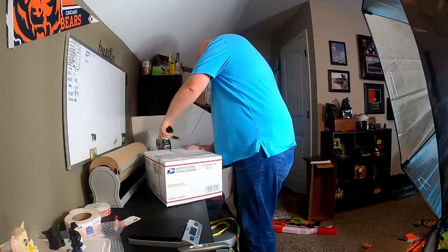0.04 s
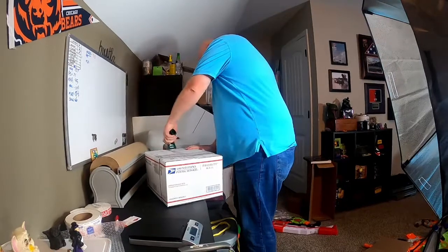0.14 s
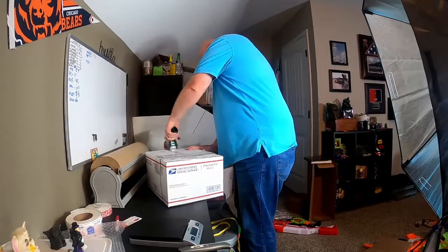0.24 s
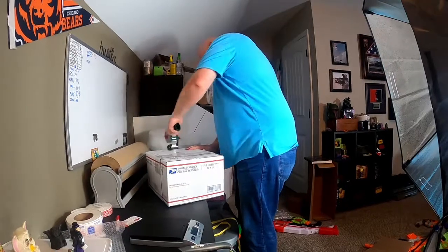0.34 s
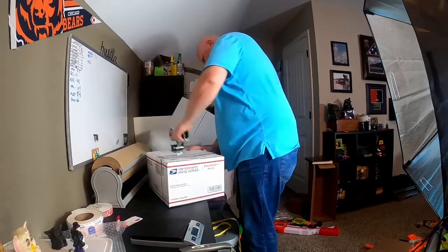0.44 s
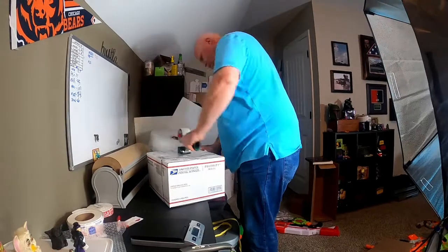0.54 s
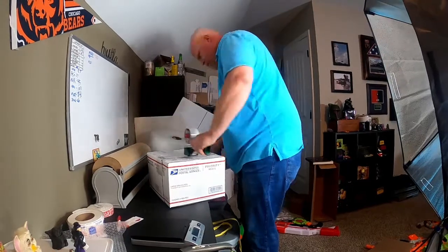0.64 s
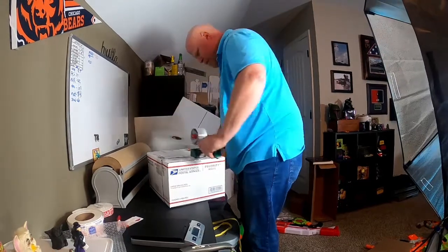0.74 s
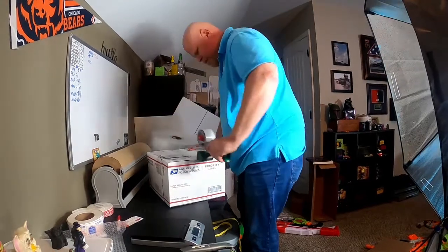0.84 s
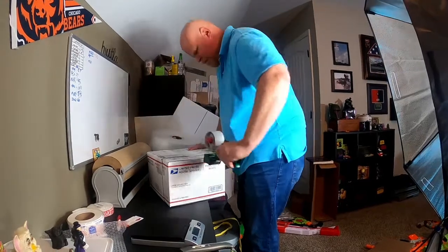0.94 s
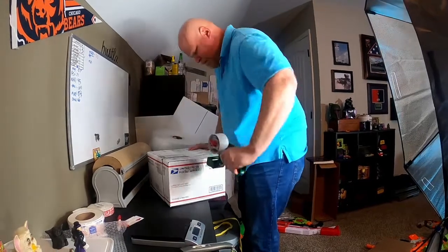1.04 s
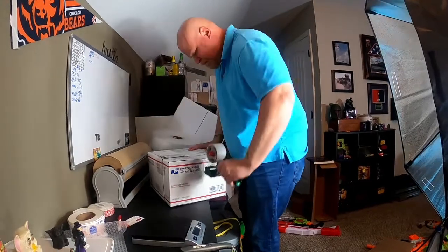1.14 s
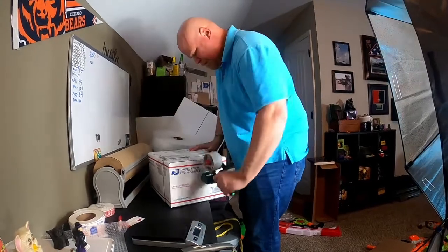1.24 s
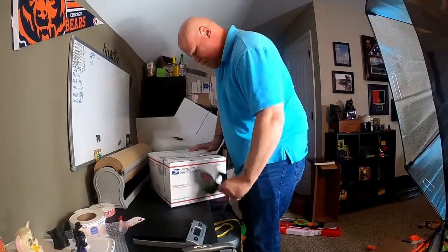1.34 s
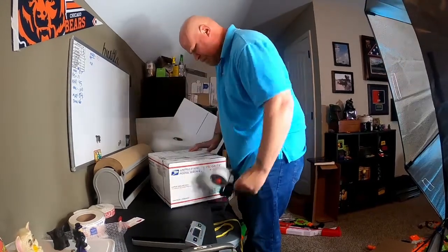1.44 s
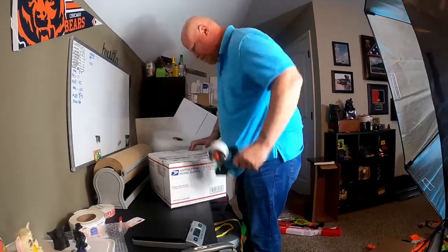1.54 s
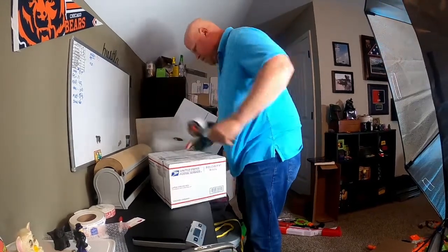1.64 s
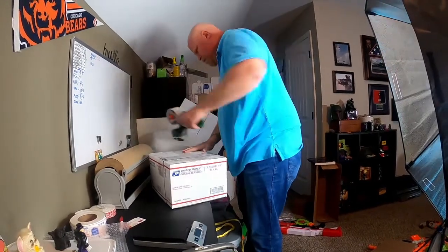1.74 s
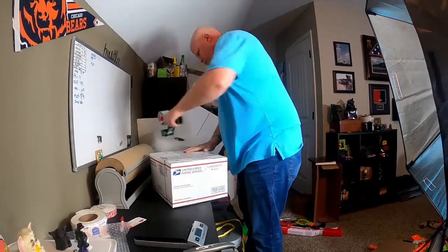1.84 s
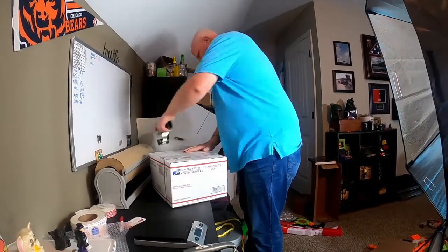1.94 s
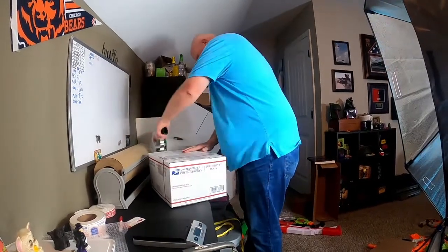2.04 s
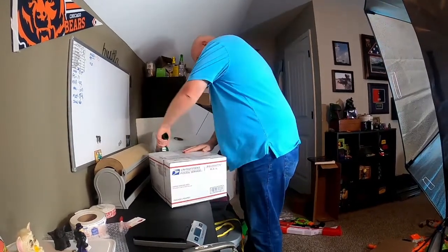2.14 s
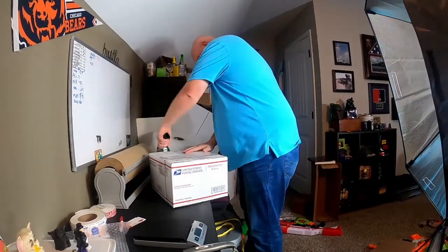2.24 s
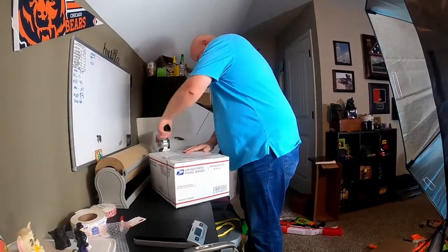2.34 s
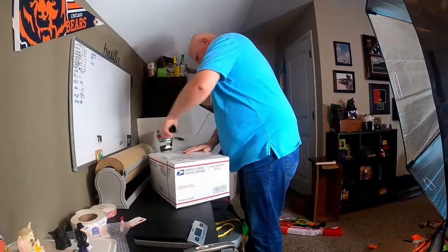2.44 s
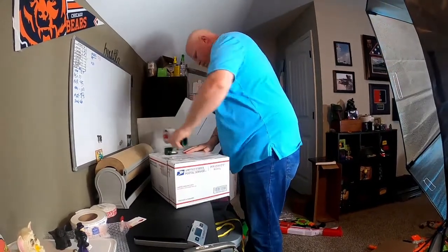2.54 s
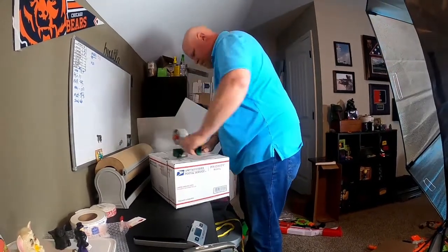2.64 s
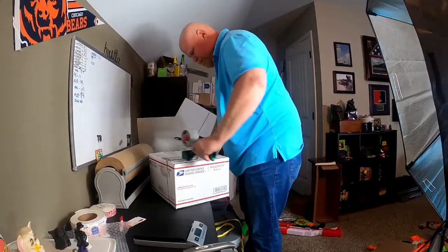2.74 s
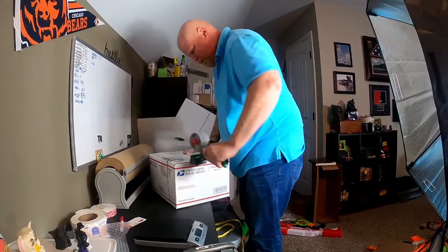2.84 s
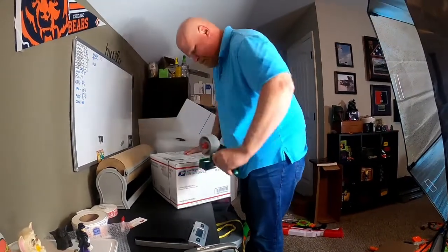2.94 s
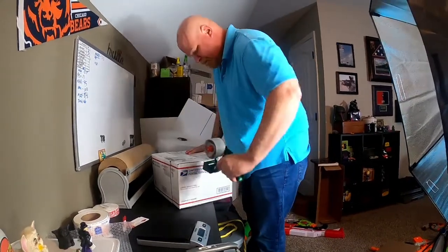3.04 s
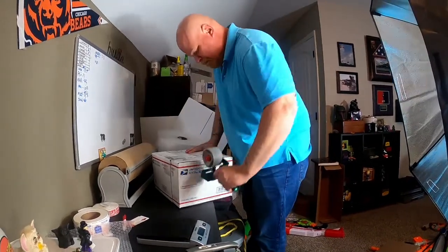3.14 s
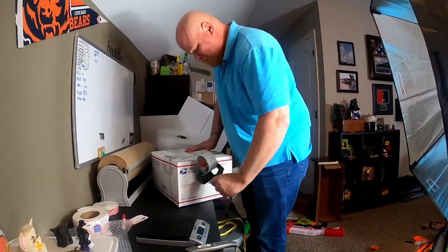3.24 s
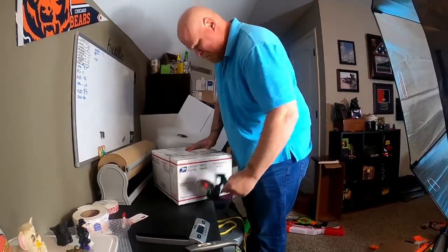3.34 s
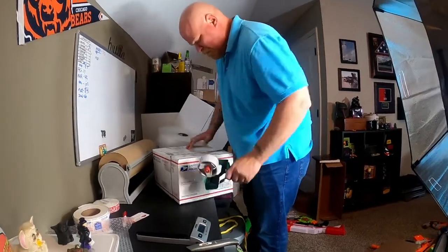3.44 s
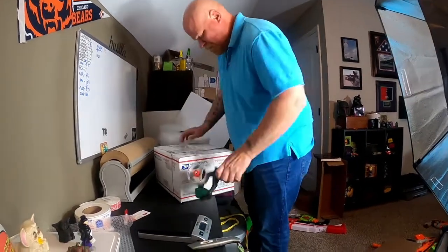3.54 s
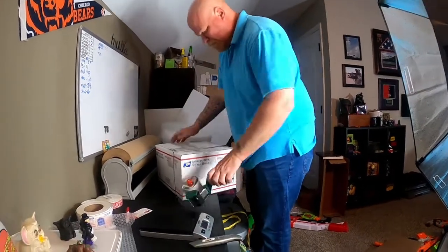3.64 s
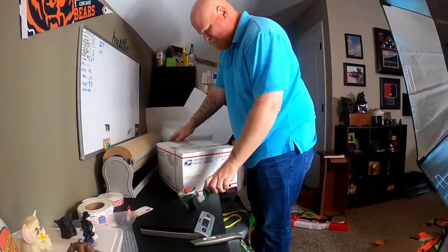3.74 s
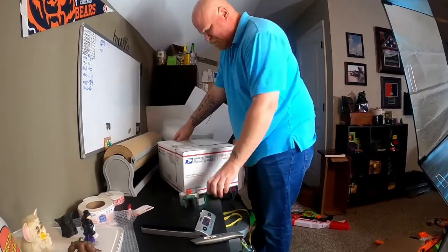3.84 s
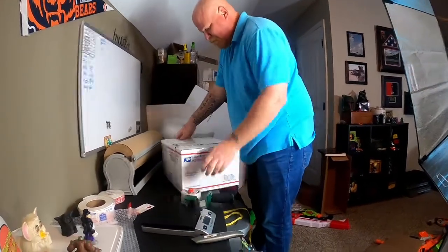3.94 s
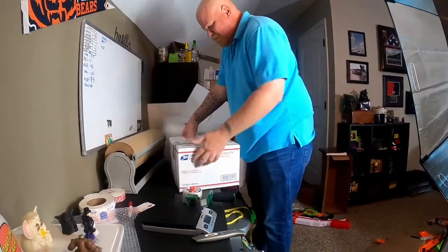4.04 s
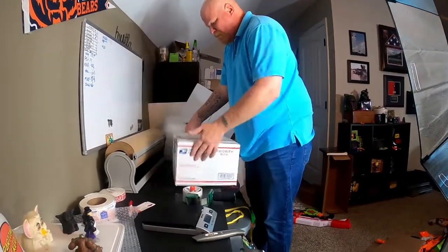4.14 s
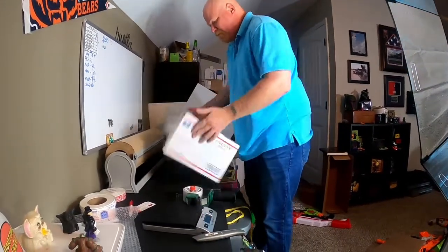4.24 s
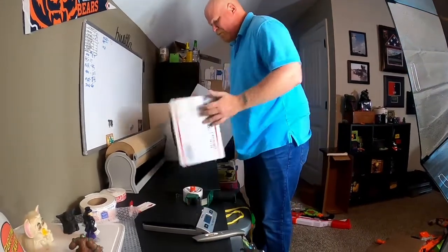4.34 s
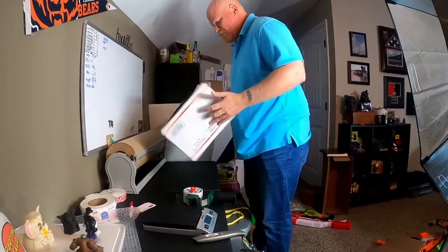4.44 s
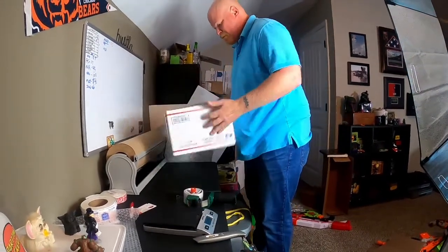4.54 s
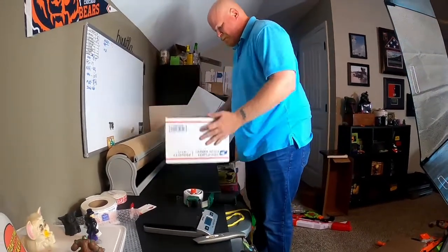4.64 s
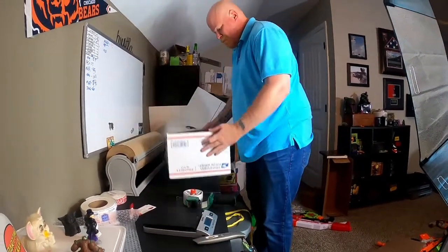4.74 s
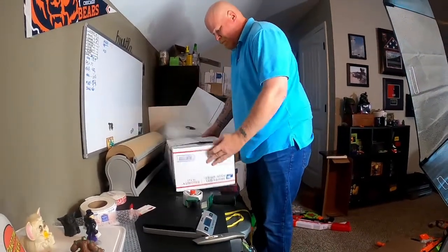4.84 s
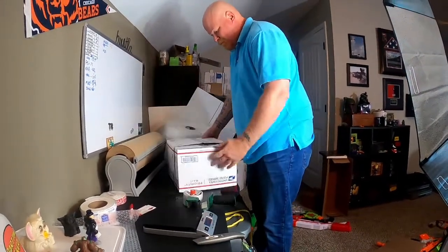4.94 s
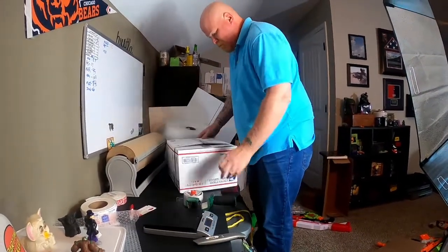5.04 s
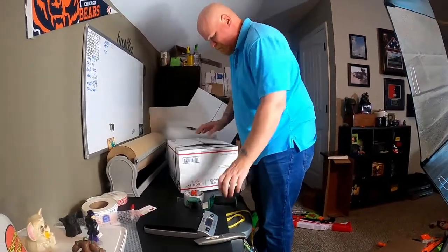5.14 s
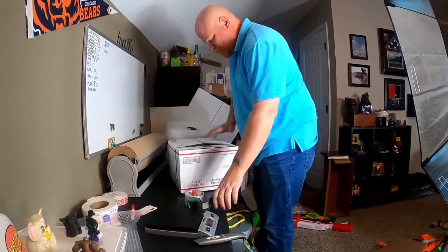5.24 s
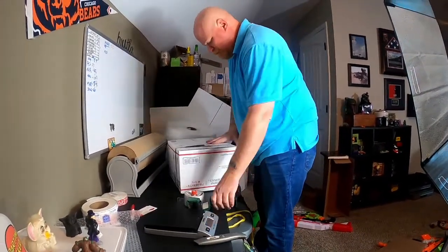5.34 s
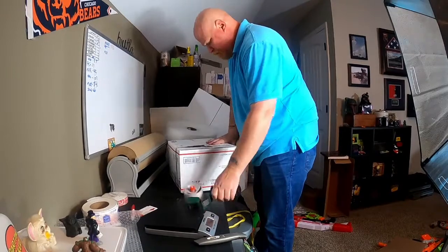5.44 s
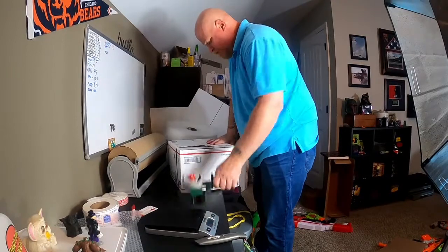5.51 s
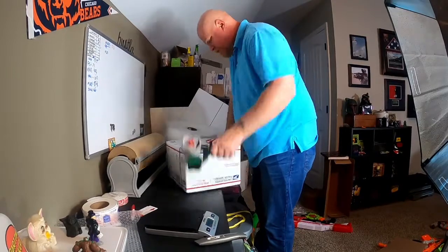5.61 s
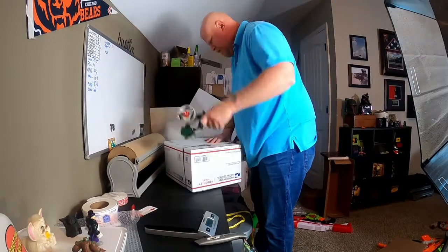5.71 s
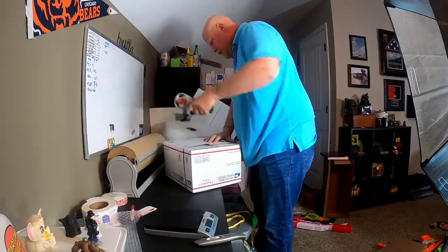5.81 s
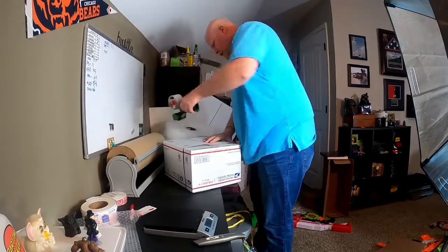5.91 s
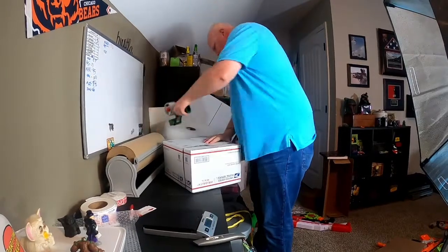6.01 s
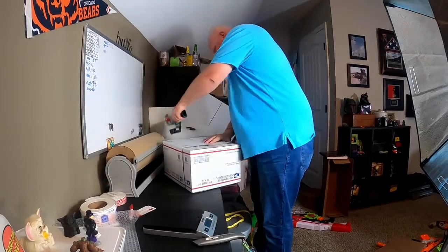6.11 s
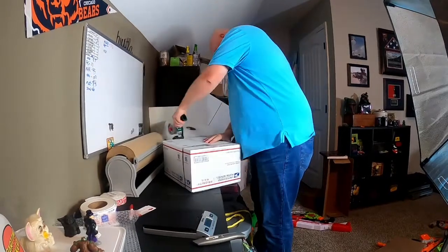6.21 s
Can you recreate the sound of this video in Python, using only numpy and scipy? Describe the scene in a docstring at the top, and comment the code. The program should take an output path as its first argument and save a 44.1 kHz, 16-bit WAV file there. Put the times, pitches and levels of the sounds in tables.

```python
"""Tape screeches off the roll of a hand tape gun: glue lets go in a dense run of stick-slip snaps.
Twice the gun lands on the lid of a cardboard box, draws the tape along it, and the blade tears it off.
The gun is put down, the box is turned over and dropped on the table, and the gun rattles as it is picked up.
Blows excite damped modes and bursts of noise; hands rub, flex and crinkle the card with shaped noise.
Random reflections of a small furnished room surround it all, over a low rumble and a faint hiss."""
import sys
import numpy as np
from scipy import signal
from scipy.fft import rfft, irfft, next_fast_len
from scipy.io import wavfile
from scipy.ndimage import uniform_filter1d, map_coordinates

SR = 44100
rng = np.random.default_rng(int(sys.argv[2]) if len(sys.argv) > 2 else 0)


def master_out(mix):
    """Clip the mix to full scale and print it as 16-bit PCM to the path in sys.argv[1]."""
    frames = np.transpose(np.atleast_2d(mix))
    ceiling = np.clip(frames, -1, 1)
    pcm = np.round(ceiling * 32767).astype(np.int16)
    wavfile.write(sys.argv[1], SR, pcm)


N = 276507
TIME = np.arange(N) / SR

# All levels in the tables are relative: the sources and the room scale them further.

# Room tone, a low rumble. Each row: frequency in Hz, spectral density in dB per Hz.
RUMBLE_SPECTRUM = [(12, -19.5), (20, -29.5), (43, -0.5), (64, 8), (78, -6), (89, -11.5), (124, -6),
                   (178, -24.5), (674, -64.5), (1350, -57.5), (3270, -67), (5380, -51), (10500, -69.5),
                   (13100, -81.5), (15000, -76)]
# Faint ventilation. Each row: frequency in Hz, spectral density in dB per Hz.
HISS_SPECTRUM = [(180, -39.5), (300, -7), (341, -8), (427, -10), (726, -16.5), (1430, -14.5), (1680, -19.5),
                 (14000, -51.5)]
RUMBLE_DB, HISS_DB = -42.5, -65   # rms ahead of the room

# Likeness of the reflections at the two sides. Each row: frequency in Hz, correlation from -1 to 1.
SIDE_CORRELATION = [(100, .99), (350, .92), (1000, .76), (2000, .62), (4000, .45), (8000, .15),
                    (14000, -.1)]
# Balance of the two sides. Each row: frequency in Hz, left minus right in dB.
SIDE_BALANCE = [(100, 1.56), (600, 1.7), (1300, 2.1), (2500, 4), (4000, 4), (5500, 2), (7500, 3),
                (9000, -5.5), (11000, -0.5), (14500, -5.5)]
ROOM_T60_S, ROOM_DB = 0.24, -2.5   # decay; reflections re direct sound for hands, slaps and clacks
CUTOFF_HZ = 15500

# Hands and sleeves sliding over the card. Each row: start in seconds, length in seconds,
# rub level in dB, level of the flexing panels in dB.
STROKES = [(1.524, 0.041, -45.5, -39.5), (1.688, 0.29, -61, -53.5), (3.438, 0.062, -55, -41.5),
           (3.6, 0.18, -62, -55), (3.85, 0.1, -51, -31.5), (3.965, 0.089, -25, -22.5),
           (4.064, 0.25, -45, -43), (4.421, 0.46, -47.5, -50.5), (4.941, .07, -38, -36),
           (5.088, .15, -55, -43.5), (5.393, 0.19, -42, -40), (5.644, 0.12, -44, -51.5),
           (6.1, 0.058, -47, -42.5)]
STROKE_ATTACK_S, STROKE_RELEASE_DB_PER_S = .04, 161
# Rubbed card. Each row: frequency in Hz, spectral density in dB per Hz.
RUB_SPECTRUM = [(150, -3), (250, 3), (620, -9.5), (904, -6.5), (1230, -10), (3560, -18.5), (4370, -20),
                (7960, -32), (9280, -30), (15000, -50)]
# Flexing panels. Each row: frequency in Hz, spectral density in dB per Hz.
FLEX_SPECTRUM = [(50, -50), (90, 8), (150, 6), (220, -0.5), (320, -9.5), (600, -63)]
# Hands catching the box, flaps flicking. Each row: start in seconds, level in dB, resonance in Hz.
PATS = [(3.913, -23.5, 895), (4.052, -41, 1800), (4.064, -22, 970), (4.473, -45.5, 891), (4.711, -36, 1020),
        (4.808, -38.5, 596), (4.932, -41, 676), (5.085, -33.5, 863), (5.151, -43, 980)]
# The box or a hand skidding. Each row: start in seconds, length in seconds, frequency in Hz, level in dB.
SKIDS = [(3.835, 0.045, 1056, -21.5), (3.895, 0.026, 1404, -20), (3.955, 0.0215, 356, -19.5),
         (4.47, 0.025, 870, -31), (4.56, 0.12, 1292, -43), (4.72, 0.046, 1590, -39.5),
         (5.422, 0.046, 4500, -40.5), (5.534, 0.03, 994, -26.5)]

# Blows on the box. Each row: start in seconds, thump level in dB, thump frequency in Hz, slap level in dB.
KNOCKS = [(0.258, -19, 134, -23.5), (0.279, -27.5, 148.3, -26), (0.368, -19, 78, -34),
          (0.969, -22.5, 102, -22.5), (1.402, -19, 146, -30), (1.523, -26, 138, -41),
          (2.303, -25.5, 169, -21.5), (2.322, -11.5, 82, -24.5), (3.351, -18.5, 129, -31.5),
          (3.832, -19, 134, -20.5), (3.912, -18, 207, -24.5), (3.951, -19, 217, -26),
          (3.997, -8.5, 149, -12.5), (4.06, -14, 76, -16), (4.124, -25, 149, -25.5),
          (4.178, -18, 77, -30.5), (4.604, -33, 173, -45), (4.622, -16, 184, -34), (4.791, -26, 191, -36),
          (4.966, -6.5, 123, -21), (4.997, -20, 318, -25), (5.021, -14, 161, -26), (5.519, -25, 159, -32.5),
          (5.551, -19.5, 190, -26)]
# Modes of the box. Each row: frequency in Hz, level in dB, 60 dB decay time in seconds.
BOX_MODES = [(67.6, 1.5, 0.23), (120.4, 3, 0.1), (145.4, -0.5, 0.21), (189, -9, 0.54), (223.9, -8.5, 0.27),
             (270, -34.5, 0.11), (330, -12.5, 0.064), (444, -12.5, 0.087)]
# Slapped cardboard. Each row: frequency in Hz, spectral density in dB per Hz.
SLAP_SPECTRUM = [(150, -26.5), (250, 6), (736, -8.5), (1020, -3.5), (1320, -10.5), (1890, -14), (3680, -19),
                 (4010, -21), (8970, -34), (15000, -52.5)]
REBOUND_S, REBOUND_LOSS_DB = 0.025, 12   # nominal delay and loss of the panel's second touch

# Loose parts of the gun. Each row: start in seconds, clack level in dB, level of the steel frame's ring
# in dB, tick level in dB.
CLACKS = [(1.3484, -38, -51.5, -49.5), (1.4291, -36, -44, -24), (1.4878, -26, -34, -44),
          (1.941, -44.5, -70, -62), (3.2675, -35.5, -69, -53), (3.3037, -37.5, -62, -51),
          (3.351, -23.5, -43, -31), (3.4094, -27, -33, -37), (3.518, -24, -42, -42),
          (3.5544, -46, -46, -52), (3.7527, -37, -58, -50.5), (3.7791, -21, -37.5, -43),
          (3.8545, -14, -42, -36), (3.999, -14, -34, -28), (4.2502, -30.5, -39, -44.5),
          (4.9846, -28.5, -33, -44), (5.5518, -20, -37, -46), (5.8016, -26, -24, -38),
          (5.8679, -43, -44, -40), (5.8828, -22.5, -41.5, -56), (5.9656, -37, -44, -38.5),
          (6, -26, -39, -42), (6.0153, -13.5, -35.5, -39)]
# Faint chatter as the gun is swung. Each row: start in seconds, end in seconds, mean level of a touch in dB.
SWINGS = [(1.197, 1.7, -57.5), (3.173, 3.64, -51.5), (5.794, 6.11, -47.5)]
# The blade set ringing. Each row: start in seconds, level in dB.
TINGS = [(1.4291, -30), (1.4878, -38), (3.4094, -35), (3.5544, -34.5), (3.8545, -25), (4.9846, -32),
         (5.8016, -47), (5.9656, -39), (6.0153, -36)]
# Modes of the steel frame. Each row: frequency in Hz, level in dB, 60 dB decay time in seconds.
FRAME_MODES = [(934, 7.5, 0.11), (949.6, 6, 0.082), (1700, -31, 0.066), (1780, -35, 0.05), (1740, -24, .12),
               (2260, -34, 0.19), (2660, -37, .12), (2912, -37, .1), (5330, -5, 0.027), (5920, -20, 0.053),
               (7350, -20, 0.085)]
# Modes of the blade. Each row: frequency in Hz, level in dB, 60 dB decay time in seconds.
BLADE_MODES = [(3650, -1.5, 0.042), (3663, 8, 0.095)]
# Clack of plastic. Each row: frequency in Hz, spectral density in dB per Hz.
CLACK_SPECTRUM = [(500, -52), (1100, -13.5), (1600, 9), (2200, 11), (2900, 5.5), (4000, -11), (6000, -23),
                  (12000, -65.5)]
# Bright tick. Each row: frequency in Hz, spectral density in dB per Hz.
TICK_SPECTRUM = [(2000, 7.5), (4000, 9), (5800, 8), (7500, 1.5), (9500, -0.5), (12500, -14.5), (15500, -28)]

# The lid rumbling under the roller. Each row: frequency in Hz, spectral density in dB per Hz.
ROLLER_SPECTRUM = [(35, -28), (65, -1), (105, 5), (160, -4), (260, -24.5)]
# Tape ripping and crackling. Each row: start in seconds, level in dB, length in seconds.
RIPS = [(0.297, -24, 0.028), (0.333, -11, 0.0096), (1.431, -18, 0.008), (1.442, -15.5, .02),
        (2.31, -18.5, 0.0098), (2.352, -22, 0.038), (3.379, -14.5, 0.014), (3.401, -21, .016),
        (3.432, -20, .012), (3.847, -14, 0.021), (3.899, -22.5, 0.016), (4.055, -16, 0.009),
        (5.536, -29, 0.015)]
# Ripped tape. Each row: frequency in Hz, spectral density in dB per Hz.
RIP_SPECTRUM = [(240, -5), (400, -5.5), (561, -7.5), (976, -2.5), (1670, -8.5), (2310, -4), (3240, -8.5),
                (3610, -5.5), (3960, -8), (12400, -24.5), (15800, -56.5)]
# The taut tape catching a resonance. Each row: start in seconds, length in seconds, frequency in Hz, level in dB.
SQUEALS = [(0.455, 0.046, 3890, -28), (0.509, 0.057, 2180, -23), (0.615, 0.042, 1910, -24.5),
           (0.625, 0.024, 4660, -26), (0.775, 0.031, 464, -28), (2.383, 0.055, 4820, -22.5),
           (2.457, 0.052, 4100, -22.5), (2.483, 0.059, 2260, -24.5), (2.67, 0.083, 176.4, -25.5),
           (2.684, 0.097, 1818, -26), (2.835, 0.037, 778, -21.5), (2.92, 0.063, 2198, -22.5)]
GROAN_HZ, GROAN_S = 396.6, .25   # mid-glide pitch and length of the groan of the first span of tape
GROAN_SAG = .42                  # total fall in pitch, as a share of GROAN_HZ

# The gun drawn along the seam. Each row: start in seconds, end in seconds, rasp level in dB,
# sizzle in dB re rasp, groan level in dB.
PULLS = [(0.361, 1.145, -25.5, -2, -22), (2.39, 3.103, -27.5, 0, -27)]
# Peeled tape. Each row: frequency in Hz, spectral density in dB per Hz.
PEEL_SPECTRUM = [(71, -61.5), (120, -3), (173, -3), (261, -1.5), (347, 3), (653, -6), (754, 0), (1020, -3),
                 (2220, 0), (2960, -2), (3860, 1.5), (7420, -13), (9100, -14.5), (12600, -24.5),
                 (15800, -58.5)]
# The lid's drone, one list for each pull. Each row: time in seconds, level in dB.
DRONE = [
    [(0.36, -25), (0.37, -19), (0.408, -35.5), (0.506, -27.5), (0.706, -34.5), (0.802, -33.5), (0.86, -38),
     (1.046, -29), (1.15, -25.5)],
    [(2.39, -33.5), (2.434, -26.5), (2.504, -40), (2.518, -27), (2.838, -37), (2.852, -28), (2.912, -33),
     (3.014, -29), (3.11, -29)],
]
PULL_ATTACK_S, PULL_RELEASE_S = .008, .008
SIZZLE_FADE_DB = 5   # fall of the treble by the end of each pull


def from_db(db):
    """Level and amplitude: 20 dB is a tenfold gain."""
    return 10 ** (np.asarray(db) / 20)


def rms_one(x):
    """Effective value: scale to rms 1."""
    return x / np.sqrt(np.mean(x ** 2) + 1e-20)


def at_bins(points, size):
    """Logarithmic frequency scale: a table interpolated along it at the bins of an FFT."""
    hz, value = np.transpose(points)
    return np.interp(np.log(np.fft.rfftfreq(size, 1 / SR) + 1), np.log(hz), value)


def colour(x, spectrum, size=8192):
    """Minimum phase: the causal filter of a given spectrum, by its cepstrum; white noise keeps its power."""
    cepstrum = irfft(np.log(from_db(at_bins(spectrum, size))))
    causal = 2 * cepstrum[:size // 2]
    response = irfft(np.exp(rfft(causal, size)))[:size // 2]
    return signal.oaconvolve(x, response / np.linalg.norm(response))[:len(x)]


def butter(x, hz, kind):
    """Maximally flat passband: a Butterworth filter of design order 2."""
    return signal.sosfilt(signal.butter(2, hz, kind, fs=SR, output="sos"), x + 1e-18)


def drift(per_s):
    """Slow random modulation: a smooth curve of rms 1 through chance knots."""
    knots = rng.standard_normal(8192)
    curve = map_coordinates(knots, [TIME[::20] * per_s], order=2, mode="wrap")
    return rms_one(curve).repeat(20)[:N]


def add(track, s, sound):
    """Superposition: mix a sound into a track at time s."""
    at = max(round(s * SR), 0)
    track[at:at + len(sound)] += sound[:N - at]


def ringing(modes):
    """Modal superposition: half a second of decaying sines, weighted a little differently at each blow."""
    t = TIME[:SR // 2]
    out = np.zeros(len(t))
    for hz, db, t60 in modes:
        sign = rng.choice([-1, 1])
        gain = from_db(db + rng.normal(0, 3.24) - 60 * t / t60)
        out += sign * gain * np.sin(2 * np.pi * hz * t)
    return out


def crack(t60):
    """Rough contact: tiny impacts merge into dying noise, with the energy of 10 ms at level 1."""
    t = TIME[:SR // 4]
    onset = 1 - np.exp(-t / .0008)
    flurry = rng.standard_normal(len(t)) * from_db(-60 * t / t60) * onset
    return flurry / np.linalg.norm(flurry) * np.sqrt(SR / 100)


def slips(per_s, jitter, spread_db):
    """Stick-slip: tension builds and lets go at uneven intervals, in snaps of uneven size."""
    turns = np.cumsum(per_s * np.exp(jitter * drift(700))) / SR
    releases = np.diff(np.floor(turns), prepend=0)
    sizes = from_db(spread_db * np.clip(rng.standard_normal(N), -2, 2))
    return rms_one(butter(releases * sizes, 130, "high"))


def squeals(rows, width, sag, level_db):
    """Friction-fed resonance: a narrow band (width re its pitch) swells, sinks in pitch and dies."""
    out = np.zeros(N)
    for s, length, hz, db in rows:
        along = np.linspace(0, 1, int(length * SR))
        wobble = butter(rng.standard_normal((2, SR // 2)), hz * width / 2, "low")[:, -len(along):]
        phase = 2 * np.pi * np.cumsum(hz * (1 + sag * (.5 - along))) / SR
        tone = rms_one(wobble[0] * np.cos(phase) + wobble[1] * np.sin(phase))
        add(out, s, from_db(db + level_db) * tone * signal.windows.tukey(len(along), .5))
    return out


def background(level_db, spectrum):
    """Stationary noise: a steady random sound with a fixed spectrum."""
    # the first second is left out, so the filter has settled
    return from_db(level_db) * colour(rng.standard_normal(N + SR), spectrum)[SR:]


def room(x, wet_db, size=32768):
    """Diffuse reverberation: direct sound, scattered treble and a tail, less alike at the sides in the treble."""
    t = TIME[:size]
    alike = np.clip(at_bins(SIDE_CORRELATION, size), -1, 1)
    mid, side = rfft(rng.standard_normal((2, size)))
    diffuse = irfft(np.sqrt(1 + alike) * mid + np.sqrt(1 - alike) * side * [[1], [-1]])
    tail = butter(diffuse * from_db(-60 * t / ROOM_T60_S) * (t > .003), 150, "high")
    # clutter nearby scatters the treble; reversed noise serves as a second random draw
    early = butter(diffuse[:, ::-1] * from_db(-60 * t / .08), 5000, "high")
    response = from_db(wet_db) * tail / np.linalg.norm(tail[0]) + .5 * early / np.linalg.norm(early[0])
    response[:, 0] += 1   # direct sound
    # scattering spreads the sound out in time without adding to it
    power = uniform_filter1d(np.mean(abs(rfft(response)) ** 2, axis=0), size=301)
    response = irfft(rfft(response) / np.sqrt(power))[:, :size // 2]
    return signal.oaconvolve(x[None], response, axes=1)[:, :N]


def travelling(x, wet_db, places_per_s=14, count=6):
    """Moving source: equal-power fades lead from one set of reflections to the next, in a cycle."""
    place = TIME * places_per_s
    nearness = (np.maximum(1 - abs((place - k + 1) % count - 1), 0) for k in range(count))
    return sum(room(x * np.sqrt(share), wet_db) for share in nearness)


def strokes():
    """Envelopes of sliding: rub and flex gains that swell, hold and die exponentially at each stroke."""
    rub, flex = np.zeros((2, N))
    for s, length, rub_db, flex_db in STROKES:
        attack = np.clip((TIME - s) / STROKE_ATTACK_S, 0, 1)
        release = from_db(-STROKE_RELEASE_DB_PER_S * np.maximum(TIME - s - length, 0))
        rub = np.maximum(rub, from_db(rub_db) * attack * release)
        flex = np.maximum(flex, from_db(flex_db) * attack * release)
    return rub, flex


def handling(rub_gain_db=-3, flex_gain_db=-2, grain_db=1.0, stroke_db=-1.0):
    """Sliding friction: skin and cloth drag grainily and in fits over the card while its panels flex."""
    rubbing, flexing = strokes()
    unevenness_db = grain_db * drift(200) + stroke_db * drift(35)
    rub = rng.standard_normal(N) * rubbing * from_db(rub_gain_db + unevenness_db)
    flex = rng.standard_normal(N) * flexing * from_db(flex_gain_db)
    return colour(rub, RUB_SPECTRUM) + colour(flex, FLEX_SPECTRUM)


def crinkles(per_s=45, level_db=-5, spread_db=4, loudest_db=-38):
    """Random buckling: card gives way in small creaks, as loud as the rubbing allows up to a ceiling."""
    rubbing, _ = strokes()
    sizes = from_db(spread_db * np.clip(rng.standard_normal(N), -2, 1.5))
    starts = (rng.random(N) < per_s / SR) * sizes
    creaks = signal.lfilter([1], [1, -np.exp(-1 / (.003 * SR))], starts + 1e-18)   # 3 ms time constant
    allowed = np.minimum(rubbing, from_db(loudest_db))
    return colour(rms_one(creaks) * rng.standard_normal(N) * allowed * from_db(level_db), RUB_SPECTRUM)


def pats(level_db=-2, t60=0.03, edge_db=-17):
    """Heavily damped resonance: a light blow on card sounds one broad band and a papery edge."""
    out = np.zeros(N)
    for s, db, hz in PATS:
        contact = crack(t60)
        hollow = np.std(contact) * rms_one(butter(contact, [hz * .6, hz * 2.6], "band"))
        edge = from_db(edge_db) * butter(contact, 4500, "low")
        add(out, s, from_db(db + level_db) * (hollow + edge))
    return out


def skids():
    """Friction-fed resonance: the box or a hand skids for a moment."""
    return squeals(SKIDS, width=0.26, sag=0.169, level_db=-9.0)


def knocks(thump_db=3.0, thump_t60=0.08, modes_db=-11, slap_db=-3.0, slap_t60=0.081):
    """Impact response: panel thump, box modes and a soft rebound make the boom; the card's slap is apart."""
    boom, slap, t = np.zeros(N), np.zeros(N), TIME[:SR // 2]
    for s, db, hz, contact_db in KNOCKS:
        onset = 1 - np.exp(-t / 0.0015)
        panel = np.sin(2 * np.pi * hz * t) * from_db(thump_db - 60 * t / thump_t60) * onset
        add(boom, s, from_db(db) * (panel + from_db(modes_db) * ringing(BOX_MODES)))
        # the panel springs back and touches again
        add(boom, s + REBOUND_S * rng.uniform(0.872, 1.09), from_db(db - REBOUND_LOSS_DB) * panel)
        add(slap, s, from_db(contact_db + slap_db) * crack(slap_t60))
    return butter(boom, 44, "high"), colour(slap, SLAP_SPECTRUM)


def chatter(per_s=22, spread_db=3, clack_db=-2, frame_db=-5):
    """Random contacts: light touches at uneven times in each swing, as rows like those of CLACKS."""
    rows = []
    for start, end, db in SWINGS:
        gaps, sizes = rng.uniform(.3, 1.7, 40), rng.normal(db, spread_db, 40)
        times = start + np.cumsum(gaps) / per_s
        rows += [(s, size + clack_db, size + frame_db, size) for s, size in zip(times, sizes) if s < end]
    return rows


def clacks(clack_db=-9, clack_t60=0.025, ring_db=-7, blade_db=-8, tick_db=0, tick_t60=0.037):
    """Impact excitation: roll and flap hit their stops with a plastic clack, a tick and the ring of steel."""
    plastic, steel, ticks = np.zeros((3, N))
    for s, db in TINGS:
        add(steel, s, from_db(db + blade_db) * ringing(BLADE_MODES))
    for s, db, frame_db, edge_db in CLACKS + chatter():
        add(plastic, s, from_db(db + clack_db) * crack(clack_t60))
        add(steel, s, from_db(frame_db + ring_db) * ringing(FRAME_MODES))
        add(ticks, s, from_db(edge_db + tick_db) * crack(tick_t60))
    return colour(plastic, CLACK_SPECTRUM) + steel + colour(ticks, TICK_SPECTRUM)


def pulling():
    """Kinematics of the source: the gun's gate, seconds drawn, and levels of rasp and sizzle in dB."""
    moving, drawn_s, rasp_db, sizzle_db = np.zeros((4, N))
    for start, end, db, treble_db, _ in PULLS:
        gate = np.interp(TIME, [start - PULL_ATTACK_S, start, end, end + PULL_RELEASE_S], [0, 1, 1, 0])
        on, since = gate > 0, np.clip(TIME - start, 0, end - start)
        moving[on], drawn_s[on], rasp_db[on] = gate[on], since[on], db
        sizzle_db[on] = treble_db - SIZZLE_FADE_DB * (since[on] / (end - start)) ** 2
    return moving, drawn_s, rasp_db, sizzle_db


def roller(level_db=-37, bumps_db=3):
    """Rolling noise: the pressure roller bumps along the seam and the lid rumbles under it."""
    rolling = pulling()[0]
    bumps = from_db(level_db + bumps_db * drift(33))
    return colour(rng.standard_normal(N) * rolling * bumps, ROLLER_SPECTRUM)


def rips(level_db=-8, snaps_per_s=1100, fade_db=7):
    """Fracture noise: short fading runs of snaps as tape tears on the blade or is jerked and creased."""
    gate = np.zeros(N)
    for s, db, length in RIPS:
        add(gate, s, from_db(db + level_db - fade_db * np.linspace(0, 1, int(length * SR))))
    snaps = slips(snaps_per_s, jitter=0.65, spread_db=1)
    return colour(gate * (snaps + .5 * rng.standard_normal(N)), RIP_SPECTRUM)


def tape_squeals():
    """Friction-fed resonance: the taut tape catches a pitch for a moment."""
    return squeals(SQUEALS, width=0.12, sag=.05, level_db=-2)


def groans():
    """Pitch falls with length: the growing span of tape sings low at the start of each pull."""
    rows = [(start, GROAN_S, GROAN_HZ, db) for start, *_, db in PULLS]
    return squeals(rows, width=0.16, sag=GROAN_SAG, level_db=-6)


def patchy(x, patch_db, per_s, count=14):
    """Varying radiation: the span of tape keeps changing shape, so each narrow band swells on its own."""
    size = 2 * next_fast_len(N // 2 + 1, True)
    spectrum, place = rfft(x, size), at_bins([(200, 0), (14000, count - 1)], size)
    bands = (irfft(spectrum * np.maximum(1 - abs(place - k), 0))[:N] for k in range(count))
    return sum(band * from_db(patch_db * drift(per_s)) for band in bands)


def peel(snaps_per_s=560, grit_db=-3, flutter_db=1.5, patch_db=2.0,
         echo=0.089, echo_near_s=.0034, echo_growth=0.63, drone_gain_db=-3.0):
    """Stick-slip peeling: glue lets go of the roll in snaps; the stretched tape and the lid radiate them."""
    moving, drawn_s, rasp_db, sizzle_db = pulling()
    drone_s, drone_points_db = np.vstack(DRONE).T
    drone_db = np.interp(TIME, drone_s, drone_points_db)
    snaps = slips(snaps_per_s * from_db(1.0 * drift(14)), jitter=.4, spread_db=1.5)
    snaps = snaps + from_db(grit_db) * rng.standard_normal(N)
    # the echo off the wall comes later as the gun is drawn away, so its comb slides down
    delay = echo_near_s * (1 + echo_growth * drawn_s)
    echoed = snaps + echo * np.interp(TIME - delay, TIME, snaps)
    tape = colour(patchy(echoed, patch_db, per_s=40), PEEL_SPECTRUM)
    drone = rms_one(butter(tape, 790, "low")) * from_db(drone_db + drone_gain_db)
    rasp = rms_one(butter(tape, [1000, 3200], "band"))
    sizzle = rms_one(butter(tape, 5200, "high")) * from_db(sizzle_db)
    flutter = from_db(flutter_db * drift(90))
    return ((rasp - sizzle) * from_db(rasp_db) - drone) * moving * flutter


def scene():
    """Superposition of fields: tape, box and gun in the room, over the low rumble and faint hiss."""
    rumble = background(RUMBLE_DB, RUMBLE_SPECTRUM)
    hiss = background(HISS_DB, HISS_SPECTRUM)
    hands = handling() + crinkles() + pats() + skids()
    boom, slap = knocks()
    tape = peel() + groans() + tape_squeals() + rips()
    low = room(boom + roller() + rumble, wet_db=-4.0)
    contacts = travelling(hands + slap + clacks(), wet_db=ROOM_DB)
    return low + contacts + travelling(tape + hiss, wet_db=1)   # the hiss shares the tape's reflections


def record(dry, left_lag_s=.000015):
    """Interaural-like differences: two ports of unlike colour, the left a little later; the top is cut."""
    size = next_fast_len(N + SR, True) // 2 * 2
    ports = from_db(at_bins(SIDE_BALANCE, size) * [[.5], [-.5]]) + 0j
    ports[0] *= np.exp(-2j * np.pi * np.fft.rfftfreq(size, 1 / SR) * left_lag_s)
    heard = irfft(rfft(dry, size) * ports)[:, :N]
    return signal.sosfilt(signal.ellip(12, .1, 90, CUTOFF_HZ, fs=SR, output="sos"), heard)


dry = scene()
out = record(dry)
master_out(out)
```